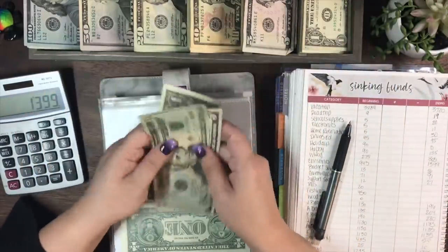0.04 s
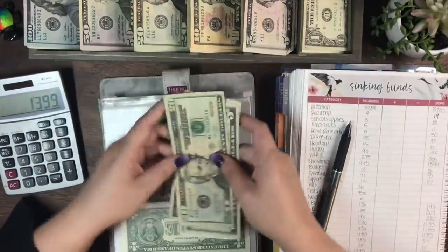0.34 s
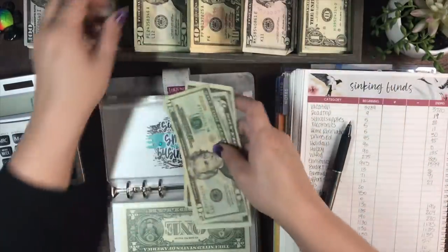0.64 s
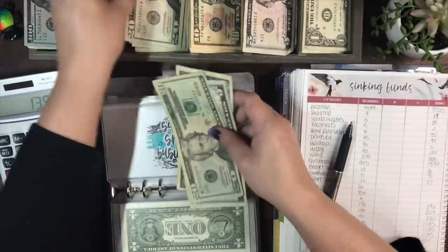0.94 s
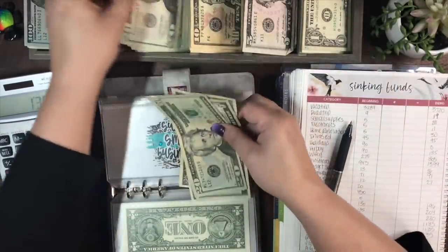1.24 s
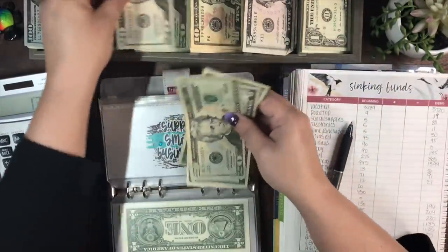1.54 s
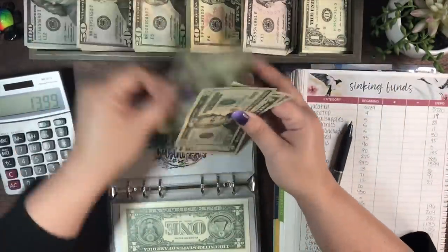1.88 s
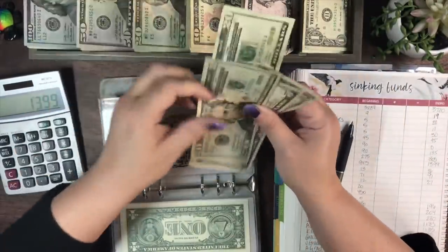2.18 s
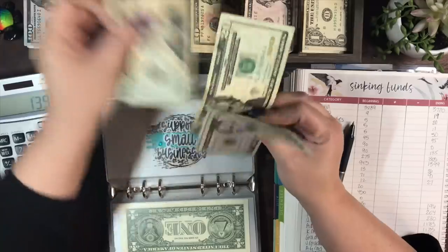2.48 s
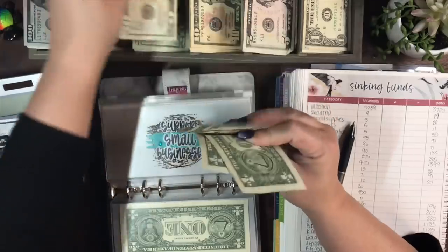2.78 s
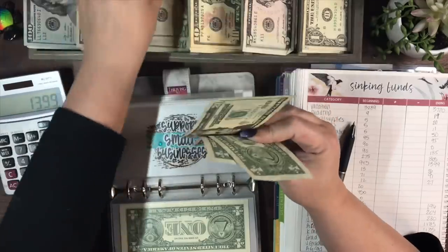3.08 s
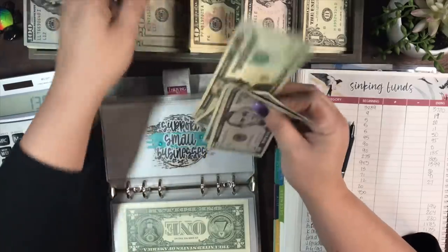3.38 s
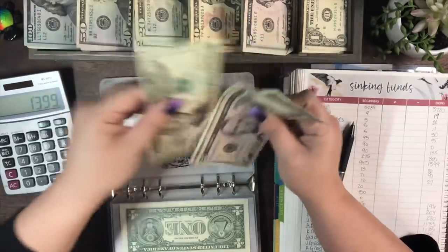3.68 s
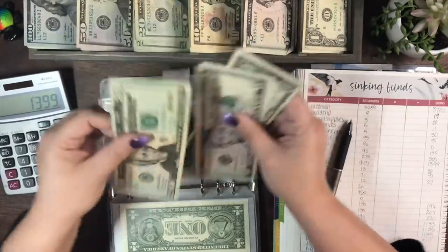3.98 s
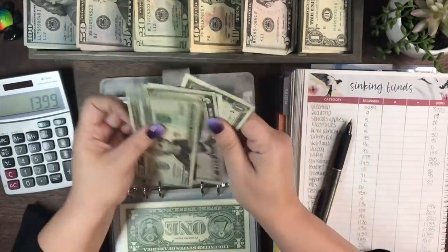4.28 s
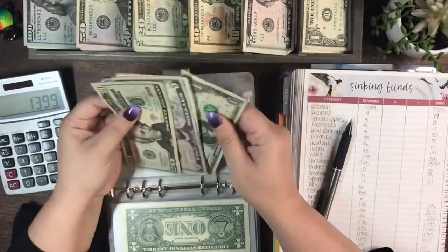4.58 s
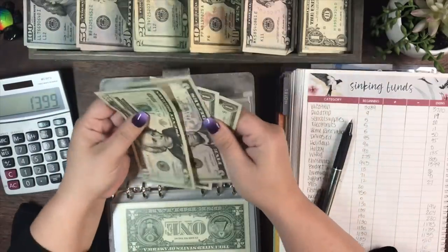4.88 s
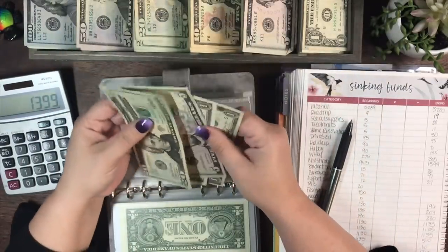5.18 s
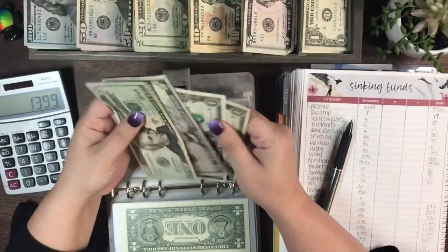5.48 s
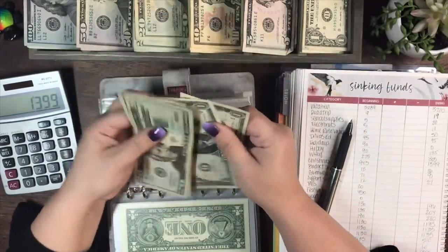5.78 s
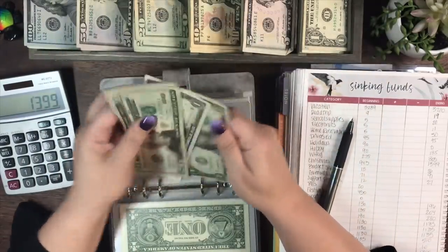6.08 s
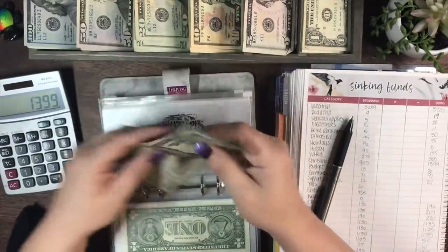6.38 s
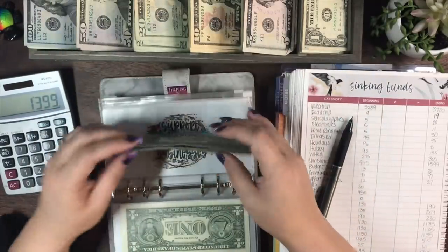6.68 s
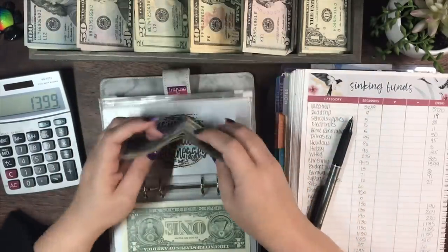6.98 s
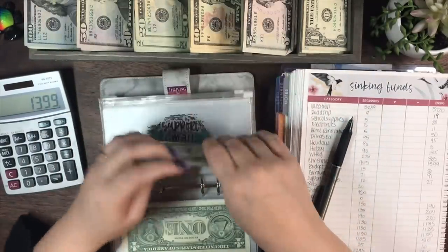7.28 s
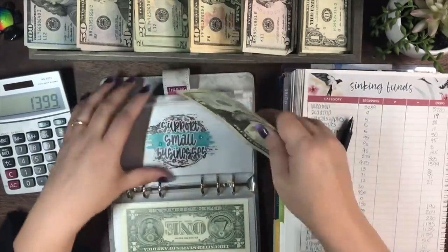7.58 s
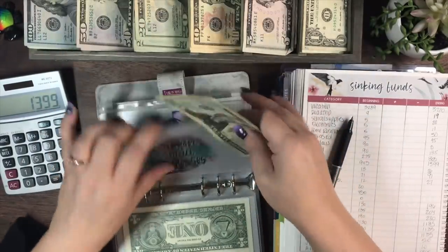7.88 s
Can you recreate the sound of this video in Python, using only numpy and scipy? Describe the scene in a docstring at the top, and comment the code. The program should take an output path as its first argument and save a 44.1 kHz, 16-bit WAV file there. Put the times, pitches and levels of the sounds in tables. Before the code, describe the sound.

Paper banknotes rustle and snap in short bursts as they are counted up close, then the stack is knocked square once.

```python
"""At a desk in a small quiet room, banknotes are taken from a tray, fanned out and counted, up close.
Sheets slide over each other in tiny stick-slips, creases snap, fingernails tick on tray and stack,
loose notes flap with a puff of air and fingers thump softly on the desk. The stack is knocked square
once, its stiff edges ringing briefly. A sleeve brushes the desk at the start; behind it all are faint
air, house rumble and an appliance's hum."""
import sys
import numpy as np
from scipy import signal
from scipy.fft import rfft, irfft
from scipy.io import wavfile
from scipy.ndimage import uniform_filter1d

SR = 44100
rng = np.random.default_rng(int(sys.argv[2]) if len(sys.argv) > 2 else 0)


def transcribe(u):
    """Save the signal u as a 16-bit wav file named by the first command-line argument.

    u: samples, shape (n,) or (channels, n), limited to [-1, 1]; the rate is SR.
    q: integer samples, one column per channel.
    """
    v = np.clip(np.atleast_2d(u).T, -1, 1)
    q = np.round(v * 32767).astype(np.int16)
    wavfile.write(sys.argv[1], SR, q)


N = 358974

# the paper's three registers, low body, crisp middle and surface hiss: freq_hz, gain_db
PAPER_BODY = [(120, -22), (300, -8), (470, -11), (670, -2), (900, -6), (1110, -3.5), (1400, -8),
              (2000, -8.5), (3500, -56)]
PAPER_CRISP = [(900, -29.5), (1550, -3), (2200, -3), (3100, 1), (3800, -2.5), (4350, 2), (5000, -0.5),
               (6000, -8), (8000, -13), (12000, -47)]
PAPER_HISS = [(3500, -40), (5500, -4.5), (7000, -1.5), (8200, -2.5), (10200, -1), (12500, -4),
              (15500, -10.5)]


def undb(db):
    return 10 ** (np.asarray(db) / 20)


def unit(x):
    return x / np.sqrt(np.mean(x ** 2))


def burst(x, db):
    """Scale a short sound so that its energy equals 10 ms at this level."""
    return x * undb(db) * np.sqrt(SR / 100 / np.sum(x ** 2))


def add(track, start_s, x):
    """Mix x into the track from start_s on."""
    i = int(start_s * SR)
    track[i:i + len(x)] += x[:N - i]


def colour(x, points, size=2048):
    """Causal EQ through (freq_hz, gain_db) points, built from the cepstrum of the log gain."""
    hz, db = np.transpose(points)
    f = np.maximum(np.fft.rfftfreq(size, 1 / SR), 1)
    gain = undb(np.interp(np.log(f), np.log(hz), db))
    cepstrum = irfft(np.log(gain))
    cepstrum[1:size // 2] *= 2
    cepstrum[size // 2 + 1:] = 0
    impulse = irfft(np.exp(rfft(cepstrum)))
    return signal.fftconvolve(x, impulse)[:len(x)]


def slips(count, per_s, scatter_db):
    """Tiny stick-slip clicks at random times and of unequal size."""
    chance, size = rng.random(count), rng.standard_normal(count)
    return (chance < per_s / SR) * rng.choice([-1, 1], count) * undb(scatter_db * np.minimum(size, 2.5))


def walk(rate_hz):
    """Smooth random drift with a spread near 1."""
    hold = int(SR / rate_hz)
    steps = np.repeat(rng.standard_normal(N // hold + 1), hold)[:N]
    return unit(uniform_filter1d(steps, hold))


def registers(level_db, bright_db, body_db, hiss_db, tilt):
    """Share a level among body, crisp and hiss; tilt is dB of body and of hiss per dB of brightness."""
    gains = undb([body_db + tilt[0] * bright_db, 0, hiss_db + tilt[1] * bright_db])
    return undb(level_db) * gains / np.linalg.norm(gains)


def room_tone():
    """The faint hiss of still air and the low rumble of the house."""
    # spectra of the air and of the rumble: freq_hz, gain_db
    air_eq = [(240, -20), (400, -5), (921, -7.5), (1060, -9.5), (1290, -12), (3830, -15.5), (5350, -18.5),
              (15000, -20)]
    rumble_eq = [(20, -19), (45, -5.5), (80, 1.5), (110, -1.5), (170, 1), (250, -4.5), (350, -5),
                 (600, -25), (1500, -45.5)]
    air = unit(colour(rng.standard_normal(N), air_eq)) * undb(-70.6)
    rumble = unit(colour(rng.standard_normal(N), rumble_eq)) * undb(-70.3 + 0.33 * walk(7.1))
    return air + rumble


def appliance_hum():
    """An appliance hums on two low tones that waver slightly in phase and level."""
    # the hum's tones: pitch_hz, level_db
    tones = [(120, -94), (128.5, -69.5)]
    t = np.arange(N) / SR
    hum = sum(undb(db) * np.sqrt(2) * np.sin(2 * np.pi * hz * t + 0.32 * walk(1.4)) for hz, db in tones)
    return hum * undb(1.1 * walk(4))


def stroke_envelopes(shape=1.3):
    """Envelopes of the three registers: each stroke speeds up and slows down; overlaps add in power."""
    # one note is drawn over another: peak_s, rise_s, fall_s, level_db, brightness_db
    strokes = [(0.073, 0.113, 0.074, -51, 2.5), (0.22, 0.07, 0.16, -67, 11),
               (0.39, 0.1, 0.038, -62.5, -0.5), (0.774, 0.025, 0.092, -58, -1.5),
               (1.16, 0.26, 0.023, -64, -2), (1.285, 0.066, 0.1, -62.5, -5), (1.55, 0.28, 0.19, -58.5, 1.0),
               (1.707, 0.071, 0.07, -61.5, 4.4), (1.831, 0.028, 0.12, -55.5, 0.8),
               (2.16, 0.083, 0.038, -57.5, 2.2), (2.26, 0.043, 0.04, -50.5, -2),
               (2.318, 0.021, 0.055, -44.5, 5.5), (2.377, 0.064, 0.019, -45, 7.3),
               (2.41, 0.03, 0.13, -59, -0.5), (2.667, 0.031, 0.033, -62, -3.5),
               (2.854, 0.094, 0.12, -55, 0.5), (3.329, 0.045, 0.042, -66.5, 4),
               (3.456, 0.011, 0.042, -50.5, -1), (3.516, 0.017, 0.041, -42, 0.5),
               (3.62, 0.06, 0.034, -42, 4.5), (3.7, 0.058, 0.019, -55.5, 0),
               (3.848, 0.042, 0.24, -61.5, 1.8), (4.078, 0.17, 0.033, -56, 2),
               (4.3, 0.34, 0.084, -58.5, 1.5), (4.407, 0.015, 0.1, -62, -1.5),
               (4.616, 0.068, 0.11, -64.5, 1.5), (4.857, 0.13, 0.039, -62.8, 1),
               (5.105, 0.12, 0.091, -61.5, -0.7), (5.304, 0.11, 0.069, -57.5, 0.7),
               (5.463, 0.026, 0.052, -49.5, 2.8), (5.66, 0.23, 0.26, -55, 1),
               (5.93, 0.077, 0.064, -59, -14), (6.062, 0.16, 0.081, -54, 1.0),
               (6.165, 0.076, 0.029, -48.5, 2.5), (6.269, 0.063, 0.11, -49.5, 3.9),
               (6.395, 0.049, 0.051, -61.0, 7.2), (6.68, 0.09, 0.085, -61.5, 4),
               (6.83, 0.038, 0.079, -55, 0.5), (6.994, 0.052, 0.024, -49.1, 1.9),
               (7.067, 0.041, 0.037, -65.5, -1), (7.2, 0.054, 0.041, -57, 2.1),
               (7.263, 0.017, 0.034, -52, -1), (7.297, 0.028, 0.011, -52, 15),
               (7.468, 0.014, 0.013, -58, 0), (7.76, 0.029, 0.033, -52.5, 0.5),
               (7.844, 0.032, 0.033, -61.0, 2.1), (7.922, 0.036, 0.04, -60.3, 2),
               (8.03, 0.027, 0.065, -59.0, 0.5)]
    t, power = np.arange(N) / SR, np.zeros((3, N))
    for peak_s, rise_s, fall_s, level_db, bright_db in strokes:
        away = np.maximum((peak_s - t) / rise_s, (t - peak_s) / fall_s)
        near = away < 5
        swell = np.exp(-away[near] ** shape)  # shape 1 is pointed, 2 bell-shaped
        gains = registers(level_db, bright_db, body_db=-3, hiss_db=-3, tilt=(-1.4, 1.26))
        power[:, near] += np.outer(gains, swell) ** 2
    return np.sqrt(power)


def bending(x, depth_db, rate_hz, count=24):
    """As the notes bend their resonances come and go: each narrow band swells on its own."""
    spectrum = rfft(x)
    f = np.maximum(np.fft.rfftfreq(N, 1 / SR), 1)
    band_index = np.interp(np.log(f), np.log([450, 15000]), [0, count - 1])
    bands = (irfft(spectrum * np.maximum(1 - abs(band_index - k), 0), N) for k in range(count))
    return unit(sum(band * undb(depth_db * walk(rate_hz * rng.uniform(.6, 1.4))) for band in bands))


def sliding(envelopes, wrinkle_s=.0015):
    """Fibres catch and let go; the same slips shake the whole sheet, its creases and its surface."""
    rubbing = unit(slips(N, per_s=20000, scatter_db=2))
    catches = abs(slips(N, per_s=80, scatter_db=4))  # a wrinkle catches and briefly rubs harder
    wrinkles = unit(signal.lfilter([1], [1, -np.exp(-1 / (wrinkle_s * SR))], catches))
    grip = undb(.8 * walk(90))  # the fingers' pull is never even
    friction = rubbing * (1 + 1.3 * np.tanh(wrinkles / 4)) * grip
    drive = bending(friction, depth_db=2.8, rate_hz=55)
    layers = (unit(colour(drive, eq)) for eq in (PAPER_BODY, PAPER_CRISP, PAPER_HISS))
    return sum(envelope * layer for envelope, layer in zip(envelopes, layers))


def sleeve_brush(peak_s=0.48, spread_s=0.7, level_db=-66.5):
    """A sleeve rubs softly over the desk, swelling and fading as the arm reaches for the tray."""
    # spectrum of cloth on the desk: freq_hz, gain_db
    cloth_eq = [(200, -3.5), (450, -3.5), (700, -8), (1000, 2), (1300, -7), (2300, -7.5), (4000, -14.5),
                (15000, -18)]
    reach = np.exp(-((np.arange(N) / SR - peak_s) / spread_s) ** 2)
    cloth = unit(colour(rng.standard_normal(N), cloth_eq))
    return cloth * reach * undb(level_db + .8 * walk(26.2))


def snap_or_tick(length_ms, pitch_hz, level_db, bright_db, size=4096):
    """A crease snap or nail tick as a dying cascade of slips; quick ones click, slow ones swell."""
    t = np.arange(size) / SR
    length_s = length_ms / 1000
    sudden = 1 / (1 + (length_s / .0045) ** 4)
    cascade = np.exp(-t / (2.4 * length_s)) * (1 - (1 - sudden) * np.exp(-t / length_s))
    drive = slips(size, per_s=7000, scatter_db=6.5) * cascade
    drive[0] += 4.4 * sudden
    ring = signal.lfilter(*signal.iirpeak(pitch_hz, Q=2.24, fs=SR), drive)
    crack = colour(ring + 0.12 * drive, PAPER_CRISP)
    # the span of paper held between the fingers gives a hollow tone that changes with the grip
    hollow_hz = 700 * np.exp(0.064 * rng.standard_normal())
    hollow = signal.lfilter(*signal.iirpeak(hollow_hz, Q=8, fs=SR), drive)
    body = colour(drive + 0.4 * hollow, PAPER_BODY)
    fizz = colour(drive, PAPER_HISS)
    gains = registers(level_db, bright_db, body_db=-6.5, hiss_db=-7, tilt=(-0.84, 1.18))
    return sum(gain * burst(layer, 0) for gain, layer in zip(gains, (body, crack, fizz)))


def crinkling(envelopes, per_s=20, relative_db=-6.5, bright_spread_db=5, pitch_spread_oct=0.47, count=5):
    """Small creases give way at random, as strongly as the notes are being moved."""
    out, motion = np.zeros(N), np.linalg.norm(envelopes, axis=0)
    for tightness in np.linspace(-1, 1, count):  # tighter creases ring higher and brighter
        pitch_hz = 3800 * 2 ** (pitch_spread_oct * tightness)
        bright_db = bright_spread_db * tightness
        snap = snap_or_tick(length_ms=2.3, pitch_hz=pitch_hz, level_db=relative_db, bright_db=bright_db)
        triggers = motion * slips(N, per_s / count, scatter_db=1)
        out += signal.oaconvolve(triggers, snap)[:N]
    return out


def snaps_and_ticks():
    """Creases buckle with a bright snap; fingernails give duller ticks on the tray and the stack."""
    # bright crease snaps and duller nail ticks: start_s, length_ms, pitch_hz, level_db, brightness_db
    hits = [(.0477, 0.98, 3830, -44.5, 4), (0.38, 3, 5500, -59.5, 18), (0.7263, 4.4, 2800, -50.5, -10),
            (.734, 1.6, 2680, -50.5, -4.5), (0.785, 3.3, 2750, -49, 0), (.856, 1.8, 3150, -56.5, 2),
            (1.0037, 5.6, 2200, -54, -12), (1.022, 3.5, 2010, -57, 0.5), (1.1047, 1.1, 3470, -46.5, -2),
            (1.1234, 3.6, 2030, -45.5, -6), (1.2263, 1.8, 2600, -62.5, -24), (1.237, 3.3, 2400, -53.5, -8),
            (1.2542, 1, 3770, -46.5, -11), (1.3233, 1.9, 4300, -53.5, 0), (1.3618, 3.5, 3800, -50, 1.5),
            (1.808, 5.5, 4100, -39.5, 8.5), (1.8146, 4.5, 5300, -40, 10), (1.8315, 7.8, 4600, -47, 5),
            (1.9842, 2.5, 2800, -44, -8.5), (2.0409, 3, 2210, -57.5, -7), (2.157, 2.5, 3100, -59.5, -8),
            (2.204, 1.7, 4770, -39, 3), (2.2111, 5.2, 4220, -43, 1.5), (2.2753, 0.81, 3350, -49, -5),
            (2.417, 3.7, 2200, -51, -16), (2.4325, 2.2, 2130, -47.5, -9), (3.4478, 3.7, 3500, -53.5, -1),
            (3.4714, 5.1, 3820, -40, 1), (3.508, 2.2, 4400, -38.5, 5), (3.516, 3.4, 4140, -34.5, -4.5),
            (3.5257, 1.1, 3320, -37.5, -4), (3.6295, 3.6, 4060, -44.5, 3), (3.9479, 1.3, 3330, -50, 6),
            (3.9828, 2.7, 3900, -53, -5), (3.991, 1.1, 3900, -52.5, -17), (4.1526, 4.5, 3120, -55, -15),
            (4.7475, 4.6, 1980, -61.5, -30), (4.786, 4, 4000, -61.5, 0), (4.8594, 3.8, 2800, -56, 10),
            (5.04, 1.6, 2830, -54, -3.5), (5.3013, 5.5, 5100, -56, 3), (5.4693, 4.4, 2760, -46.5, -0.5),
            (5.7897, 2.5, 1670, -48, -2.5), (5.942, 4.9, 1830, -49, -6.5), (6.0301, 6.5, 3200, -50.5, -9),
            (6.2568, 6.3, 3780, -43.5, 3), (6.288, 4, 3560, -40, -3.5), (6.4022, 4.7, 4470, -55.5, -3),
            (6.8806, 7.5, 2700, -51, -8), (7.2302, 1.4, 1950, -53, 1), (7.545, 1, 5350, -64, 22),
            (7.6636, 2.2, 6200, -57.5, 14), (7.7103, 3.4, 4270, -57.5, 4.5), (7.864, 2.9, 4800, -55.5, 9),
            (8.0867, 1.5, 4500, -61.5, -5)]
    out = np.zeros(N)
    for start_s, length_ms, pitch_hz, level_db, bright_db in hits:
        add(out, start_s, snap_or_tick(length_ms, pitch_hz, level_db, bright_db))
    return out


def flaps_and_thumps(full_flap_db=-45.5, full_puff_db=-49.5, size=6000):
    """A flapping note or a finger landing on the desk gives a soft low puff and a short hollow tone."""
    # notes flap; the two lowest in pitch are soft finger thumps: start_s, length_ms, pitch_hz, level_db
    hits = [(1.364, 5.1, 259, -56.5), (1.52, 7.5, 930, -57.5), (1.984, 9.2, 744, -54.5),
            (2.277, 3.6, 740, -44), (2.377, 19, 670, -47.5), (3.507, 7.4, 656, -42), (3.53, 10.2, 725, -39),
            (4.153, 5.9, 646, -52.5), (4.3, 5.5, 610, -58), (4.496, 4.1, 570, -56.5),
            (5.255, 3.9, 680, -54.5), (5.467, 5.9, 630, -46), (5.79, 23, 660, -57), (5.912, 16, 646, -51),
            (6.29, 6, 686, -52), (7.229, 2.9, 243, -56.5)]
    # spectrum of the low puff: freq_hz, gain_db
    puff_eq = [(20, -64), (50, 2), (80, 8), (160, 2.5), (300, -6), (600, -11), (1200, -22)]
    out, t = np.zeros(N), np.arange(size) / SR
    for start_s, length_ms, pitch_hz, level_db in hits:
        age = t * 1000 / length_ms
        puff = rng.standard_normal(size) * np.sqrt(age) * np.exp(-1.3 * age)
        hollow = signal.lfilter(*signal.iirpeak(pitch_hz, Q=4.5, fs=SR), puff)
        puff_db = full_puff_db + 1.08 * (level_db - full_flap_db)  # a slight move pushes hardly any air
        air = burst(colour(puff, puff_eq), puff_db)
        tone = burst(colour(hollow, PAPER_BODY), level_db)
        add(out, start_s, air + tone)
    return out


def knocking(size=4096):
    """Stiff paper edges strike a binder on the desk: very short, bright rings and a brief chatter."""
    # the edges of the stack land one after another: start_s, level_db
    knocks = [(6.6405, -38), (6.646, -37), (6.656, -31), (6.659, -32), (6.6637, -21.5), (6.6728, -50.5)]
    # resonances of the knocked stack: pitch_hz, t60_s, gain_db
    modes = [(285, 0.017, -35), (738, .03, -20.5), (970, 0.015, -19), (2300, 0.014, -16.5),
             (3105, 0.0036, 5.5), (4550, 0.0059, 2.5), (6540, .004, -17.5), (10300, .0015, 1.5),
             (14070, .002, -12)]
    # spectrum of loose edges chattering after a knock: freq_hz, gain_db
    chatter_eq = [(200, -19.5), (450, -15.5), (750, -3), (1300, -5), (2700, -2), (5000, -6), (8000, -10),
                  (15000, -17)]
    out, t = np.zeros(N), np.arange(size) / SR
    chatter_decay = np.exp(-t / 0.0036) + 0.063 * np.exp(-t / 0.027)
    for start_s, level_db in knocks:
        detunes = 1 + .015 * rng.standard_normal(len(modes))
        motion = sum(undb(db - 60 * t / t60_s) * np.sin(2 * np.pi * hz * detune * t) / hz
                     for (hz, t60_s, db), detune in zip(modes, detunes))
        ring = np.diff(motion, prepend=0)  # the air follows the edges' speed, so there is little bass
        ring = signal.lfilter([1, 2, 1], 1, ring)  # the paper gives a little, rounding the attack
        chatter = colour(rng.standard_normal(size) * chatter_decay, chatter_eq)
        add(out, start_s, burst(ring, level_db) + burst(chatter, level_db - 7.5))
    return out


def room(x, early_db, early_t60_s, late_db, late_t60_s, size=16000):
    """Quick reflections from the desk top and tray, then the short dull tail of the walls."""
    t = np.arange(size) / SR
    early = rng.standard_normal(size) * undb(-60 * t / early_t60_s) * (t > .001)
    late = rng.standard_normal(size) * undb(-60 * t / late_t60_s) * (t > .008)
    early = colour(early, [(500, -1), (7000, -1), (15000, -2)])
    late = colour(late, [(500, 0.5), (5000, -5.5), (9000, -1.5), (15000, -18)])
    echo = undb(early_db) * early / np.linalg.norm(early) + undb(late_db) * late / np.linalg.norm(late)
    return x + signal.fftconvolve(x, echo)[:N]


def scene():
    """The handled notes and the sleeve in the room, over a quiet bed of room tone and hum, in mono."""
    envelopes = stroke_envelopes()
    handling = sliding(envelopes) + snaps_and_ticks() + flaps_and_thumps() + knocking()
    handling += crinkling(envelopes) + sleeve_brush()
    foley = room(handling, early_db=-11, early_t60_s=0.049, late_db=-20, late_t60_s=0.23)
    return (foley + room_tone() + appliance_hum())[None]


def record(dry):
    """A steep low-pass cuts the very top of the treble."""
    cutoff_hz = 15850
    return signal.sosfilt(signal.ellip(10, .2, 70, cutoff_hz, fs=SR, output="sos"), dry)


dry = scene()
out = record(dry)
transcribe(out)
```